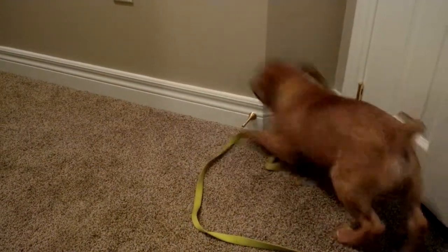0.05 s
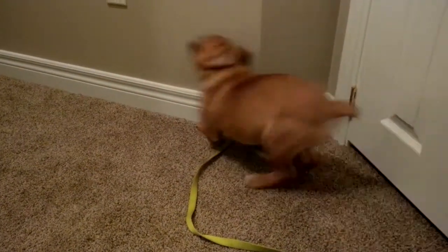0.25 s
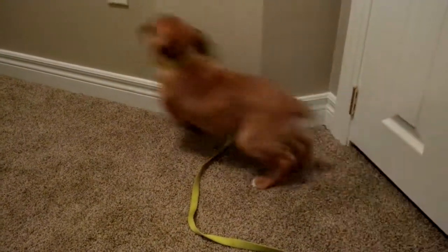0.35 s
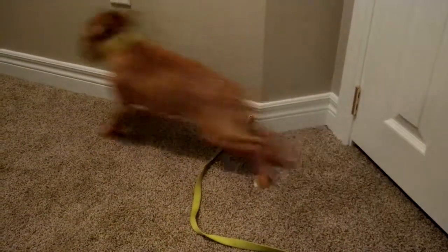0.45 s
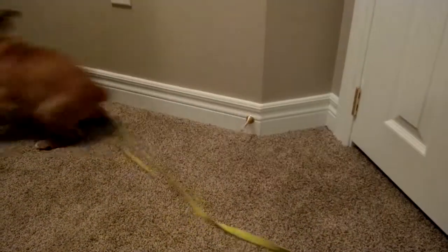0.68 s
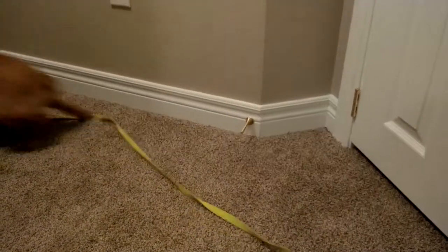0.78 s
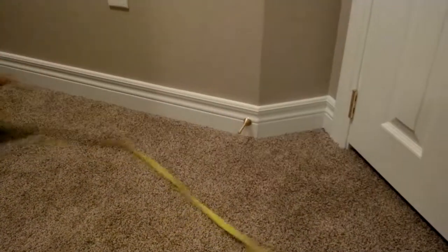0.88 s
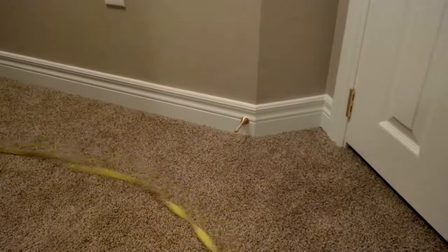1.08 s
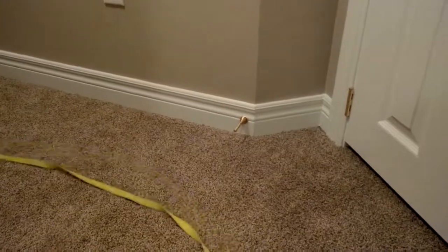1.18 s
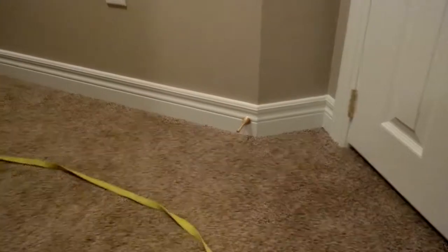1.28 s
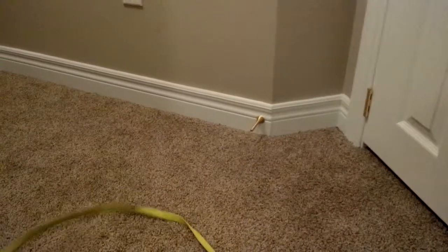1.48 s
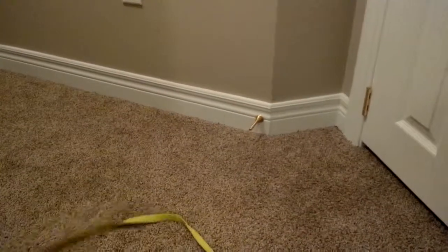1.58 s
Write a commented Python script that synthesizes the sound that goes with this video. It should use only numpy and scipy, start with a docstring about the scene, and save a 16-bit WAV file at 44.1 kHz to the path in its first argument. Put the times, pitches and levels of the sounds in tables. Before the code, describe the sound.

A spring door stop on a baseboard is flicked and buzzes, its coils clashing and twanging for under a second, then muffled puppy paw thuds and leash rustle on carpet; small room, close stereo microphone.

```python
"""In a small carpeted room, a puppy flicks a coiled steel door stop on a baseboard and bolts, trailing its leash.
The coils clash as the spring whips about: each clash is a pulse that returns along the coil as a buzz,
chirps by dispersion, feeds the spring's decaying sine modes and thumps the board as filtered pulses.
Paws are sinking sine knocks with noise thuds and scuffs; the leash drags as grainy noise and its clasp
tinkles as narrow-band noise. Noise and a low sine make the hush and rumble; noise tails make the room."""
import sys
import numpy as np
from scipy import signal
from scipy.fft import rfft, irfft, next_fast_len
from scipy.io import wavfile
from scipy.ndimage import uniform_filter1d, map_coordinates

SR = 44100
rng = np.random.default_rng(int(sys.argv[2]) if len(sys.argv) > 2 else 0)


def log_audio(samples):
    """Write samples as a 16-bit WAV file to the path given in sys.argv[1]."""
    # one column per channel
    frames = np.atleast_2d(samples).T
    # limit to full scale, then quantise
    limited = np.clip(frames, -1, 1)
    pcm = np.round(limited * 32767).astype(np.int16)
    wavfile.write(sys.argv[1], SR, pcm)


N = 72765
T = np.arange(N) / SR
M = next_fast_len(2 * N, True)  # transform length, padded against wrap-around
HZ = np.fft.rfftfreq(M, 1 / SR)

# Coil clashes. Each row: start in seconds, then the relative levels in dB of the twang, the zing,
# the thump on the board and the bright tick.
CLASHES = [(.172, -26, -34, -23.5, -34), (.221, -23, -25.5, -26, -32.5), (.237, -12, -18, -28, -29),
           (.266, -12.5, -4.5, -29, -19), (0.275, -14, -12, -29.5, -30), (.291, -8.5, -9.5, -15, -23),
           (.338, -6.5, -9, -23, -28), (.349, -23, -16, -15.5, -29), (0.371, -12, -21, -20.5, -27.5),
           (.385, -13.5, -10.5, -19, -28.5), (.406, -16.5, -9, -24.5, -35), (.452, -13, -22.5, -16.5, -26),
           (.464, -13.5, -28, -14, -29.5), (.497, -12.5, -13.5, -16.5, -27),
           (.520, -14.5, -8.5, -19, -26.5), (.572, -26, -21, -23, -30), (.591, -24, -13.5, -25, -37),
           (.600, -20, -20.5, -26, -33), (.641, -18.5, -44, -21, -34), (0.698, -18.5, -25, -25, -35),
           (.718, -26.5, -23.5, -36, -48), (.773, -49, -25, -26, -32), (.784, -18, -33, -28.5, -42),
           (.921, -38, -32.5, -29.5, -42.5), (0.93, -29.5, -38, -33, -56), (1.05, -40, -34.5, -40, -42)]
TRIP_HZ, TRIP_JITTER_S = 88, 0.00014  # round trips of a pulse along the coil per second; timing scatter
WAVER_RAD = .5  # phase waver of the spring's modes


def amp(db):
    """Level law: decibels to an amplitude ratio."""
    return 10 ** (np.asarray(db) / 20)


def unit(x):
    """Normalisation: scale to a root mean square of 1."""
    return x / np.sqrt(np.mean(x ** 2) + 1e-20)


def along(points, hz=HZ):
    """Logarithmic pitch: interpolate (Hz, value) points on a log frequency axis."""
    point_hz, values = np.transpose(points)
    return np.interp(np.log(hz + 1), np.log(point_hz + 1), values)


def curve(points):
    """Linear interpolation: (seconds, value) points to one value per sample."""
    return np.interp(T, *np.transpose(points))


def wobble(rate):
    """Band-limited fluctuation: a smooth random curve with `rate` knots a second."""
    knots = rng.standard_normal(int(N * rate / SR) + 4)
    return map_coordinates(knots, [T * rate])


def filtered(x, response):
    """Linear filtering: multiply the spectrum of x by a frequency response."""
    return irfft(rfft(x, M) * response, M)[..., :N]


def colour(points):
    """Minimum phase: a causal response of energy 1 that falls away beyond its end points."""
    beyond = np.clip(np.minimum(HZ / points[0][0], points[-1][0] / (HZ + 1)), 1e-3, 1)
    gain = unit(amp(along(points)) * beyond ** 2)
    # folding the cepstrum onto positive times makes the response causal
    cepstrum = irfft(np.log(gain + 1e-6), M)
    cepstrum[1:M // 2] *= 2
    cepstrum[M // 2 + 1:] = 0
    return np.exp(rfft(cepstrum))


def noise(points):
    """Spectral shaping: coloured noise of rms 1."""
    return unit(filtered(rng.standard_normal(N), colour(points)))


def decay(s, t60, attack=0.00027, hold=0):
    """Exponential damping: the envelope of a blow at time s, falling 60 dB in t60 seconds after the hold."""
    age = np.maximum(T - s, 0)
    rise = 1 - np.exp(-age / attack)
    return amp(-60 * np.maximum(age - hold, 0) / t60) * rise


def bounces(times, levels_db, loss_db, count=10):
    """Repeated reflection: each pulse returns once per round trip, on average loss_db weaker each time."""
    scatter_db = 3.5
    trip = np.arange(count)
    shape = (len(times), count)
    late = np.cumsum(TRIP_JITTER_S * rng.standard_normal(shape) * (trip > 0), axis=1)
    at = times[:, None] + trip / TRIP_HZ + late
    scatter = scatter_db * rng.standard_normal(shape) * (trip > 0)
    size = amp(levels_db[:, None] - loss_db * trip + scatter)
    pulses = np.bincount(np.round(at * SR).astype(int).ravel(), size.ravel(), N)[:N]
    return pulses * np.sqrt(.005 * SR)  # levels count as rms over 5 ms


def grind(pulses, share):
    """Contact break-up: a share of each pulse's energy spreads into a short gritty burst."""
    burst_s = .0035
    share = np.clip(share, 0, 1)
    keep = np.exp(-1 / (burst_s * SR))
    energy = signal.lfilter([1 - keep], [1, -keep], pulses ** 2)
    burst = np.sqrt(energy) * rng.standard_normal(N)
    return np.sqrt(1 - share) * pulses + np.sqrt(share) * burst


def dispersion():
    """Dispersion: the coil delays its high frequencies, so that each pulse becomes a rising chirp."""
    longest_s, knee_hz = 0.003506, 2744  # the delay is constant above the knee
    lag = longest_s * np.minimum(HZ / knee_hz, 1) ** 3
    return np.exp(-2j * np.pi * np.cumsum(lag) * SR / M)  # phase is the integral of group delay


def background():
    """Steady broadband noise and phase modulation: room hush and a wavering low rumble."""
    # Each row: frequency in Hz, relative level in dB.
    hush_colour = [(40, -9.5), (90, -2.5), (150, -8), (320, -7), (800, -13), (2200, -23.5), (2750, -20),
                   (3400, -30), (5800, -34), (7500, -55)]
    # Each row: time in seconds, level in dB, of the hush and of the rumble.
    hush_level = [(0, -49), (.12, -41), (.9, -38.5), (1.21, -43), (1.65, -41)]
    rumble_level = [(0, -51), (.7, -39.5), (1.35, -41), (1.65, -54.5)]
    rumble_hz = 27.7
    rumble = np.sqrt(2) * np.sin(2 * np.pi * rumble_hz * T + .5 * wobble(5.7))
    hush = amp(curve(hush_level)) * noise(hush_colour)
    return hush + amp(curve(rumble_level) + 1.7 * wobble(7.05)) * rumble


def paws():
    """Impact and friction: the puppy shoves off; each paw knocks the floor and grittily scuffs the pile."""
    # Paw falls. Each row: start in seconds, starting floor note in Hz, relative thud and scuff levels in dB.
    falls = [(0.087, 337, -42, -51), (.845, 310, -35, -37), (1.029, 340, -40, -31),
             (1.043, 343, -31, -32.5), (1.066, 443, -34, -36.5), (1.166, 316, -52, -34.5),
             (1.293, 339, -32.5, -34), (1.357, 327, -33, -53), (1.375, 443, -37.5, -57),
             (1.397, 305, -38.5, -37), (1.432, 459, -35, -40), (1.451, 337.6, -28.5, -35.5)]
    # Spectra of shove, thud and scuff. Each row: frequency in Hz, relative level in dB.
    shove_colour = [(70, -13), (110, -3.5), (190, 1), (260, -15.5)]
    thud_colour = [(110, -32), (220, -9.5), (320, -1), (400, -11), (600, -24), (1500, -40)]
    scuff_colour = [(200, -10), (450, -5.5), (850, 7), (1400, -7.5), (2700, -10), (4500, -20), (9000, -54)]
    knock_db, thud_db = 2, -3  # the floor's note under a paw, and the dull noise around it
    sag_hz_per_s = 960  # the note sinks as the paw settles
    press_s = .016  # how long the heaviest paw presses

    # the puppy's weight pushes off the floor
    shove = amp(-24) * decay(.214, t60=0.58, attack=0.0093) * noise(shove_colour)

    thud = amp(thud_db) * noise(thud_colour)
    steps = np.zeros(N)
    heaviest_db = max(db for _, _, db, _ in falls)
    for s, hz, db, _ in falls:
        age = T - s
        knock = amp(knock_db) * np.sin(2 * np.pi * (hz - sag_hz_per_s * age / 2) * age)
        hold = press_s * amp(db - heaviest_db)
        steps += amp(db) * decay(s, t60=0.13, attack=0.0016, hold=hold) * (knock + thud)

    scuffs = sum(amp(db) * decay(s, t60=0.15, attack=0.00096) for s, _, _, db in falls)
    return shove + steps + scuffs * amp(3.2 * wobble(300)) * noise(scuff_colour)


def leash():
    """Friction noise and resonance: webbing drags grainily over the carpet; the clasp clicks and tinkles."""
    # Each row: time in seconds, level of the drag in dB.
    drag_level = [(0, -90.5), (.14, -54.5), (.17, -33.5), (.21, -42.5), (.86, -49), (1.01, -45.5),
                  (1.12, -51), (1.21, -60.5), (1.27, -46.5), (1.32, -41), (1.38, -52.5), (1.65, -70)]
    # Each row: frequency in Hz, relative level in dB.
    drag_colour = [(300, 10), (1000, -3.5), (3500, 5), (5500, -2), (8000, -5), (12000, -12.5), (15500, -39)]
    # Clasp tinkles. Each row: start in seconds, resonance in Hz, level in dB.
    tinkles = [(0.187, 5300, -24.5), (0.77, 13800, -27), (1.111, 14700, -33.5)]
    half_width = .04  # of the resonance, as a fraction of its frequency
    grain_db = 3.0 * wobble(350) + 0.16 * wobble(35.0)
    out = amp(curve(drag_level) + grain_db) * noise(drag_colour)
    for s, hz, db in tinkles:
        band = 1 / (1 + ((HZ - hz) / (half_width * hz)) ** 2)
        click = np.exp(-np.abs(np.log((HZ + 1) / hz)) / 0.94)  # a broad skirt about the resonance
        tinkle = unit(filtered(rng.standard_normal(N), unit(band) + unit(click)))
        out += amp(db) * decay(s, t60=0.033) * tinkle
    return out


def chatter():
    """Periodic contact: loose coils scrape and tap once per round trip, a gritty buzz between the clashes."""
    # Each row: time in seconds, relative level in dB.
    tap_level = [(.15, -82), (.22, -27.5), (.28, -20), (.40, -21), (.44, -28.5), (.53, -24.5), (.72, -26),
                 (.752, -31.5), (.88, -34), (.95, -43.5), (1.1, -61)]
    # Each row: frequency in Hz, relative level in dB.
    tap_colour = [(150, -12), (315, 5.5), (550, -7.5), (1020, 6), (1400, -5), (1850, -8), (2700, -6),
                  (6000, -25), (15500, -30.5)]
    trips = np.arange(tap_level[0][0], tap_level[-1][0], 1 / TRIP_HZ)
    late, scatter = rng.standard_normal((len(trips), 2)).T
    at = np.round((trips + TRIP_JITTER_S * np.cumsum(late)) * SR).astype(int)
    size = amp(curve(tap_level)[at] + 2 * scatter)
    taps = np.bincount(at, size, N) * np.sqrt(SR / TRIP_HZ)  # levels count as rms over a trip
    return filtered(grind(taps, share=.9), colour(tap_colour) * dispersion())


def hum():
    """Fundamental mode: the spring's lowest mode holds one pitch, swelling with each bout of clashes."""
    # Each row: time in seconds, level in dB.
    hum_level = [(.15, -56), (.24, -33), (.31, -22), (.385, -17.5), (.44, -52), (.465, -23), (.6, -26),
                 (.75, -51), (.785, -37), (.9, -51), (1.05, -62)]
    hum_hz = 258
    cycles = hum_hz * T + rng.random()
    tone = np.sqrt(2) * np.sin(2 * np.pi * cycles + WAVER_RAD * wobble(19.87))
    return amp(curve(hum_level)) * tone


def clashes():
    """Travelling waves: pulses on the coil sound through the baseboard as thump, twang, rising zing and tick."""
    # Spectra of the four parts. Each row: frequency in Hz, relative level in dB.
    twang_colour = [(350, -15), (600, -35), (720, -10.5), (880, -0.5), (980, -1), (1130, -5.5),
                    (1400, -20.5), (2000, -43)]
    zing_colour = [(900, -25), (1450, -10.5), (1680, 2), (1860, 2.5), (2040, -11.5), (2330, 0), (2600, 4),
                   (2950, -14), (3200, -10), (4000, -18.5), (6000, -50)]
    thump_colour = [(110, -21), (180, -8.5), (215, -8.5), (258, 2), (310, -4), (400, -10), (560, -29.5),
                    (900, -56.5)]
    tick_colour = [(1500, -28), (3500, 8), (5500, 5), (7500, -1.5), (10500, 0), (15500, -15)]
    twang_trim_db, zing_trim_db, thump_trim_db, tick_trim_db = -2, -1, -1, -0.5
    tick_t60, tick_echo_db = 0.081, -11  # seconds; level of a tick's first return
    s, twang_db, zing_db, thump_db, tick_db = np.transpose(CLASHES)

    twang_pulses = grind(bounces(s, twang_db + twang_trim_db, loss_db=5.5), share=0.38)
    twang = filtered(twang_pulses, colour(twang_colour))
    zing_pulses = grind(bounces(s, zing_db + zing_trim_db, loss_db=10.0), share=.5)
    zing = filtered(zing_pulses, colour(zing_colour) * dispersion())
    thump = filtered(bounces(s, thump_db + thump_trim_db, loss_db=6.5), colour(thump_colour))

    tick_energy = np.zeros(N)
    for at, db in zip(s, tick_db):
        echo = amp(tick_echo_db) * decay(at + 1 / TRIP_HZ, tick_t60)
        tick_energy += (amp(db + tick_trim_db) * (decay(at, tick_t60) + echo)) ** 2
    return twang + zing + thump + np.sqrt(tick_energy) * noise(tick_colour)


def ring():
    """Modal resonance: every clash feeds the spring's long modes, which waver as it swings."""
    # Modes. Each row: frequency in Hz, relative level in dB.
    modes = [(704, -6), (791, -12), (879, -5.5), (976, 3.5), (1102, -2), (1675, -0.5), (1807, -21),
             (1851, -1.5), (2107, -7), (2277, -19), (2364, -8.5), (2495, -10), (2643, -3)]
    decay_cycles = 650  # a mode falls 60 dB within this many cycles
    s, twang_db = np.transpose(CLASHES)[:2]
    fed = np.bincount(np.round(s * SR).astype(int), amp(twang_db) ** 2, N)
    out = np.zeros(N)
    for hz, db in modes:
        t60 = decay_cycles / hz
        energy = signal.lfilter([1], [1, -amp(-120 / (t60 * SR))], fed)
        smooth = np.sqrt(np.abs(uniform_filter1d(energy, size=120)))
        level = smooth * amp(db + 3.3 * wobble(20.16))
        cycles = hz * T + rng.random()
        out += level * np.sin(2 * np.pi * cycles + WAVER_RAD * wobble(19.7))
    return amp(-17) * out


def room(x):
    """Reverberation: a short decaying answer whose bass stays central and whose treble spreads wide."""
    # Each row: frequency in Hz, reverberation time in seconds.
    room_t60 = [(200, 0.36), (2000, 0.17), (10000, 0.092)]
    # Central and sideways answer. Each row: frequency in Hz, level in dB.
    mid_level = [(150, -16.5), (1200, -5.5), (12000, -4.5)]
    side_level = [(150, -15), (280, -31.5), (500, -7.5), (1000, -10), (2000, 1), (4000, 0), (12000, 1)]
    hz, t, z = signal.stft(rng.standard_normal((2, SR // 2)), SR, nperseg=256)
    fading = amp(-60 * t / along(room_t60, hz)[:, None])
    tails = signal.istft(z * fading, SR, nperseg=256)[1]
    answer = rfft(tails, M)
    # flatten the broad spectrum so that the level tables alone set it
    answer /= np.sqrt(np.abs(uniform_filter1d(np.abs(answer) ** 2, size=300, axis=1)))
    mid = filtered(x, 1 + answer[0] * amp(along(mid_level)))  # the 1 is the direct sound
    side = filtered(x, answer[1] * amp(along(side_level)))
    return np.array([mid + side, mid - side])


def scene():
    """Superposition: spring, puppy and hush add up in one room."""
    puppy = paws() + leash()
    spring = chatter() + hum() + clashes() + ring()
    return room(amp(-1.5) * (background() + puppy + spring))


def record(dry):
    """Level difference and band limit: the microphones lean slightly left and keep nothing above 16 kHz."""
    # Each row: frequency in Hz, level of left over right in dB.
    balance = [(800, 1.2), (2000, 0.06)]
    lean = amp(along(balance) * np.array([[.5], [-.5]]))
    return filtered(dry, lean * (HZ < 16000))


dry = scene()
out = record(dry)
log_audio(out)
```